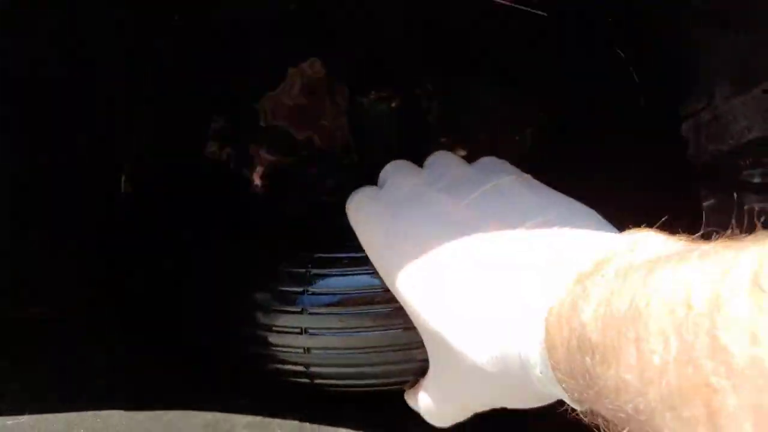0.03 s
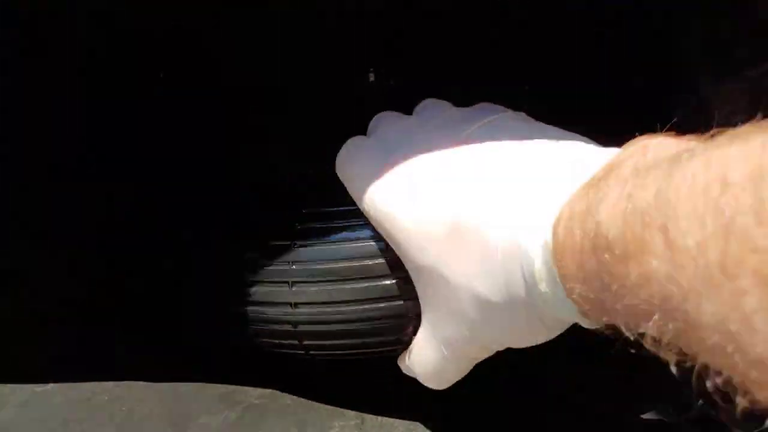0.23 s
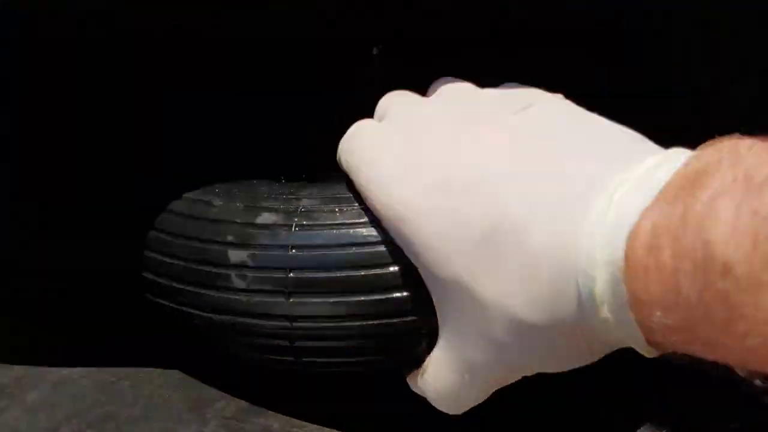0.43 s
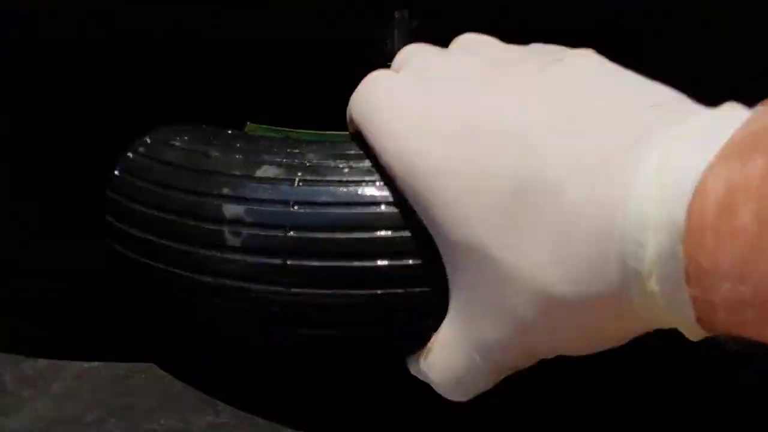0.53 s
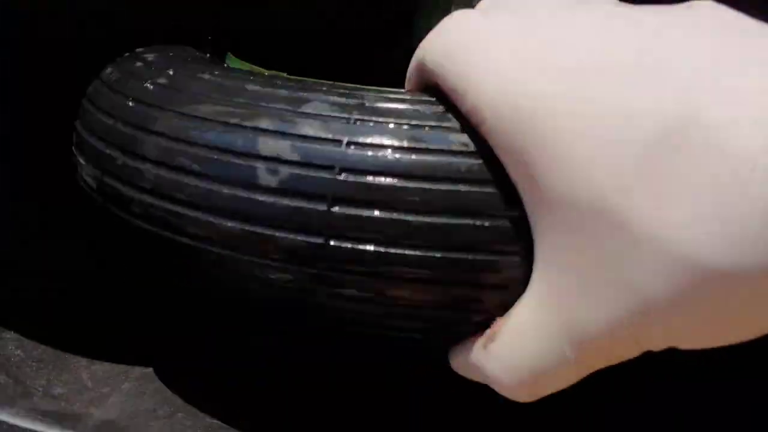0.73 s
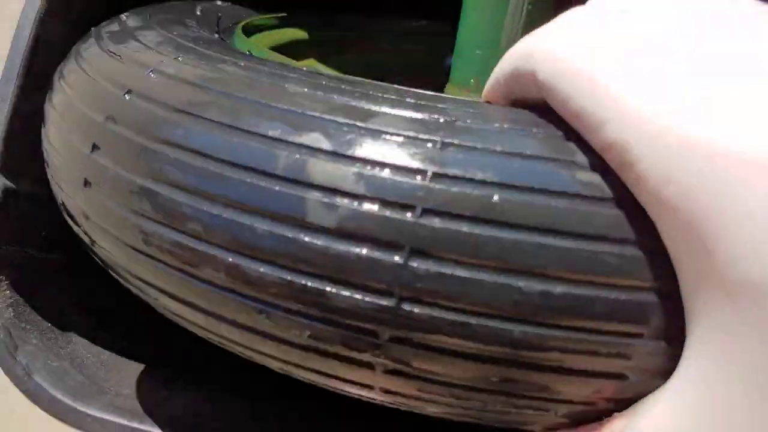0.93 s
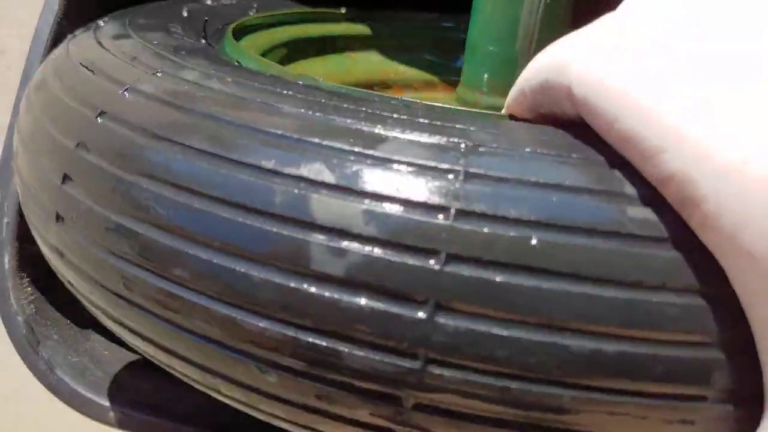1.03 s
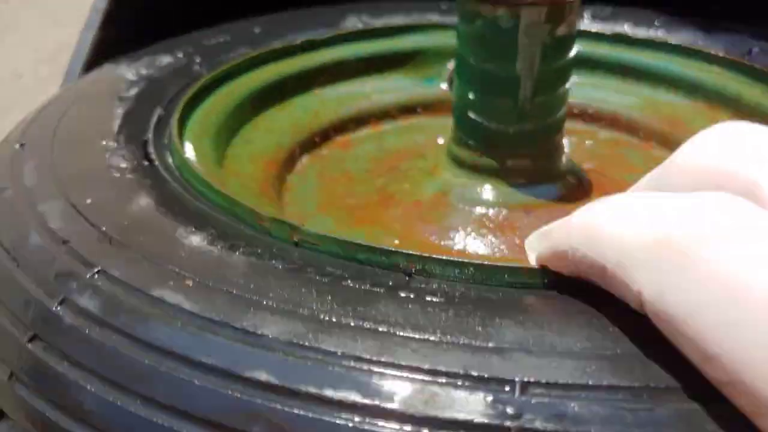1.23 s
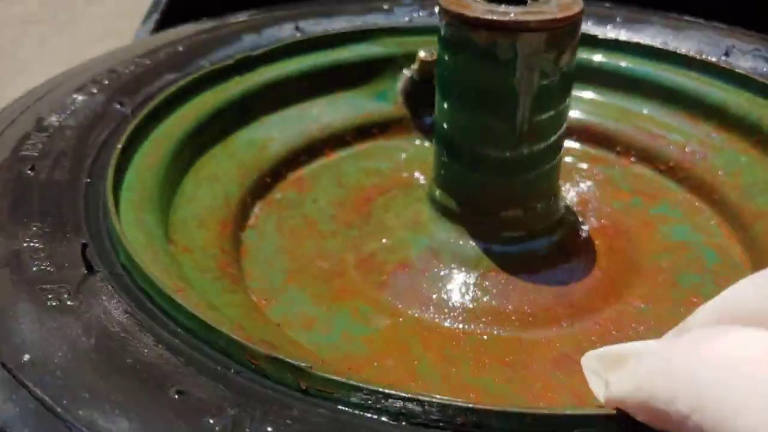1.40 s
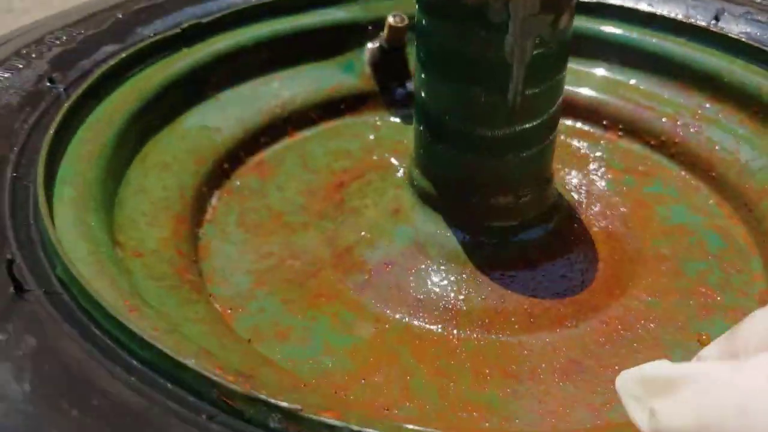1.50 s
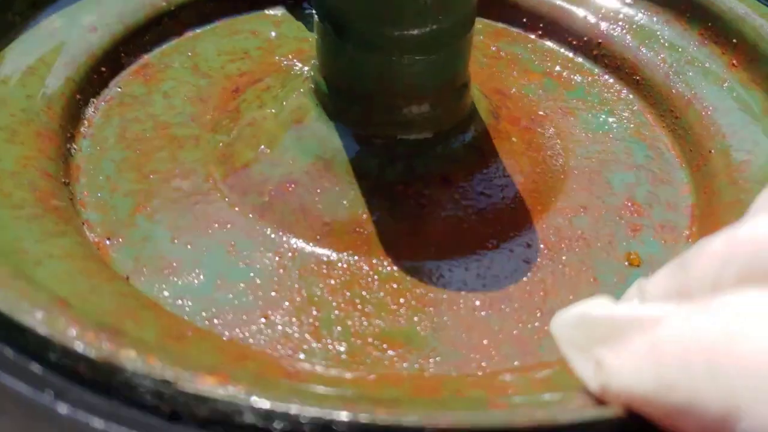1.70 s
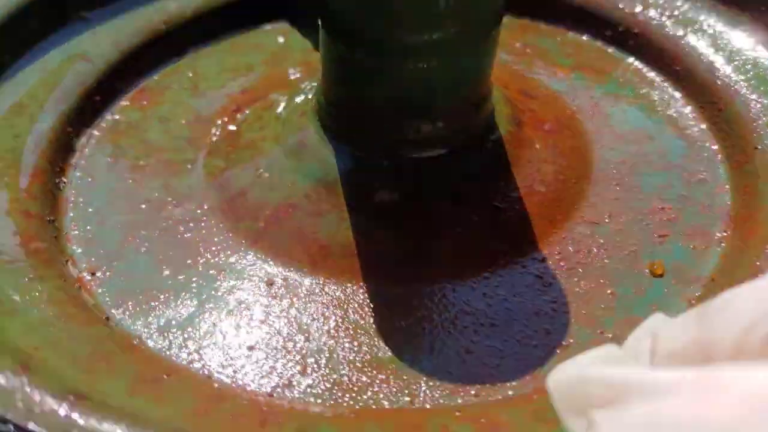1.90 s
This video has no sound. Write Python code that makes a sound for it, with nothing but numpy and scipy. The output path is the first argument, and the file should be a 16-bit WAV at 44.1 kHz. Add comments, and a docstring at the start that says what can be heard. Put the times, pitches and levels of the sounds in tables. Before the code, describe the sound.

Close, outdoor splashing: water swells and gurgles hollowly as a wheel comes out of a tub and sheds a short stream. Light plinking drips follow, ending with tiny bubbly squeaks over a faint hiss.

```python
"""Outdoors, at a plastic tub of water, a small wheel with a rubber tyre is lifted out by a gloved hand.
Water sheets off the tread, gulps and splashes as the tyre breaks free, then thins to drips.
Trapped bubbles ring as damped oscillators, drop impacts give broadband ticks, and the tub adds
air resonances and wall echoes. The water film on the wheel crackles and, at the end, chirps.
A faint hiss, a low rumble and the hum of a far machine lie underneath."""
import sys
import numpy as np
from scipy import signal
from scipy.fft import rfft, irfft
from scipy.io import wavfile
from scipy.ndimage import uniform_filter1d

SR = 44100
rng = np.random.default_rng(int(sys.argv[2]) if len(sys.argv) > 2 else 0)


def put_to_file(sound):
    """Save the sound as 16-bit audio at rate SR, in the file named by the first command-line argument."""
    columns = np.atleast_2d(sound).T  # one column per channel
    safe = np.clip(columns, -1, 1)
    whole_steps = np.round(safe * 32767)
    wavfile.write(sys.argv[1], SR, whole_steps.astype(np.int16))


N = 85995
T = np.arange(N) / SR


def from_db(db):
    """The decibel scale: 20 dB is a factor of ten in amplitude."""
    return 10 ** (np.asarray(db) / 20)


def unit_power(x):
    """RMS normalisation: the mean square becomes one."""
    return x / np.sqrt(np.mean(x ** 2) + 1e-20)


def level(rows):
    """Amplitude envelope interpolated through rows of t/s, level/dB."""
    return from_db(np.interp(T, *np.transpose(rows)))


def gain_at(colour, hz):
    """Spectral envelope: rows of f/Hz, level/dB, interpolated in log frequency."""
    f, db = np.transpose(colour)
    return from_db(np.interp(np.log(hz + 1), np.log(f), db))


def pan(db):
    """Interaural level difference: left over right by db, at constant power."""
    return unit_power(from_db(np.array([[db], [-db]]) / 2))


def place(sound, pan_db, max_lag_s=.00012):
    """Interaural time and level difference: the far side hears it later and softer."""
    lag = max_lag_s * SR * np.tanh(pan_db / 6)
    right = np.roll(sound, int(np.rint(lag))) * (np.arange(len(sound)) >= lag)
    return pan(pan_db) * np.array([sound, right])


def tint(x, colour):
    """Linear filtering: the spectrum is multiplied by a colour; unit power."""
    hz = np.arange(N + 1) * SR / (2 * N)
    return unit_power(irfft(rfft(x, 2 * N) * gain_at(colour, hz))[..., :N])


def noise(colour, correlation):
    """Partial coherence: mid and side noise set the left-right correlation; unit power."""
    mid, side = rng.standard_normal((2, N))
    return tint(np.sqrt(1 + correlation) * mid + np.sqrt(1 - correlation) * side * [[1], [-1]], colour)


def jitter(samples):
    """A moving average low-passes white noise into a random wobble; unit power."""
    return unit_power(uniform_filter1d(rng.standard_normal(N), size=samples))


def add(out, start_s, sound):
    """Superposition: a sound joins the mix at its onset."""
    i = int(np.clip(start_s * SR, 0, N - 1))
    out[:, i:i + sound.shape[-1]] += sound[..., :N - i]


def bursts(rows, attack_s=.00076):
    """Impulsive excitation: envelopes that rise at once and decay exponentially."""
    return sum(np.clip((T - s) / attack_s, 0, 1) * from_db(db - 60 * np.abs(T - s) / t60)
               for s, db, t60 in rows)


def droplets(colour, per_s, spread_db):
    """Shot noise: independent ticks of uneven size; unit power."""
    sizes = from_db(spread_db * np.minimum(rng.exponential(1, N), 3))
    arrivals = rng.random(N) < per_s / SR
    return tint(arrivals * sizes * rng.normal(.63, 1, (2, N)), colour)


def bubble(hz, t60, rise_oct_per_s, wobble=0, attack_s=.0012, max_rise_oct=.65):
    """Minnaert resonance: a damped sine whose pitch climbs as the bubble nears the surface."""
    t = T[:int(max(t60, .002) * SR)]
    pitch = np.minimum(hz * 2 ** np.minimum(rise_oct_per_s * t, max_rise_oct), SR / 2)
    if np.ndim(wobble):
        pitch = pitch * (1 + wobble[:len(t)])
    envelope = from_db(-60 * t / t60) * (1 - np.exp(-t / attack_s))
    return envelope * np.sin(2 * np.pi * np.cumsum(pitch) / SR)


def swarm(colour, low_hz, high_hz, cycles, size_db, rise_oct_per_s, width_db, count):
    """Incoherent sum of bubbles of random time, pitch, size and place, levelled to near unit power."""
    out = np.zeros((2, N))
    for when, pitch, size, life, climb, side, lag in rng.random((count, 7)):
        hz = low_hz * (high_hz / low_hz) ** pitch
        gain = gain_at(colour, hz) * hz * from_db(size_db * size ** 2)
        ring = bubble(hz, cycles * (.5 + life) / hz, rise_oct_per_s * climb)
        delay = int(lag * 24)  # left leads or trails right by up to 12 samples
        pair = np.array([np.pad(ring, (delay, 24 - delay)), np.pad(ring, (12, 12))])
        add(out, when * N / SR, gain * pan(width_db * (2 * side - 1)) * pair)
    power = uniform_filter1d(np.mean(out ** 2, axis=0), size=3000)
    return out / np.sqrt(np.abs(power) + .017 * power.mean())


def background():
    """Continuous spectra of rumble and hiss under the line spectrum of a far machine."""
    # spectra of the rumble, the hiss and the hum: f/Hz, level/dB
    rumble_colour = [(22, -20), (40, 3.5), (58, 6.5), (75, 7), (115, 12), (150, -2), (200, -3.5),
                     (290, -7.5), (600, -54)]
    hiss_colour = [(300, -6.5), (700, 0), (1500, -5.5), (3000, -1), (4500, 4.5), (5500, 5.5), (6400, -8),
                   (9000, -9.5), (11300, -14.5), (12400, -46)]
    hum_lines = [(59, -47), (119, -46), (1760, -61)]
    # slow swell of the hiss: t/s, level/dB
    hiss_swell = [(0, -48), (.9, -40.5), (1.4, -40), (1.95, -37.5)]
    hum = sum(from_db(db) * np.sqrt(2) * np.sin(2 * np.pi * (hz * T + rng.random()))
              for hz, db in hum_lines)
    rumble = from_db(-40.5) * noise(rumble_colour, .58)
    hiss = level(hiss_swell) * noise(hiss_colour, .067)
    return pan(-2.2) * (rumble + hum) + pan(2.7) * hiss


def glove():
    """Friction: the rubber glove creaks in faint noise bursts as it grips the tread."""
    # creaks: t/s, level/dB, T60/s
    creaks = [(.112, -54, 0.017), (.128, -48, .015), (.177, -53, 0.018), (.193, -51, .015),
              (.205, -40, 0.017)]
    # their spectrum: f/Hz, level/dB
    colour = [(2500, -14), (5000, -6), (9000, 0), (12000, 0), (13500, -30)]
    return bursts(creaks) * noise(colour, .6)


def film():
    """Small cavities resonate high: tiny bubbles burst and crackle as the wheel drains."""
    # envelope of the crackle: t/s, level/dB
    envelope = [(0, -60), (.45, -65), (.55, -64), (.6, -41.5), (.95, -47), (1.19, -45), (1.27, -52),
                (1.58, -48), (1.7, -46), (1.75, -42.5), (1.82, -41), (1.87, -47), (1.95, -47)]
    # its spectrum: f/Hz, level/dB
    colour = [(2500, -16), (3800, -10), (5200, -1.5), (6600, -0.5), (8200, 1.5), (10000, -3), (11300, -36),
              (12600, -42)]
    pops = swarm(colour, 3000, 11000, cycles=40, size_db=13, rise_oct_per_s=25, width_db=12, count=1000)
    ticks = droplets(colour, per_s=430, spread_db=3)
    return level(envelope) * pan(1) * (from_db(-2) * pops + from_db(-4.5) * ticks)


def chirps(rise_oct_per_s=8.5, roughness=.03):
    """Frequency modulation: air in the water film squeaks in short, rough, rising glides."""
    # tiny bubbles on the wet wheel: t/s, f/Hz, peak level/dB, duration/s, left-right/dB
    squeaks = [(1.732, 7930, -25.5, 0.0062, -0.5), (1.751, 8000, -30, 0.0091, 0.5),
               (1.756, 5700, -40, .009, 0), (1.78, 3745, -22.5, 0.013, -5.5),
               (1.785, 4270, -24, 0.0062, 4.5), (1.796, 3680, -25, 0.004, 2),
               (1.797, 6100, -29.5, 0.007, 26), (1.818, 4200, -28, 0.013, 9), (1.826, 4830, -27, 0.017, 21),
               (1.837, 5570, -30, 0.022, 28), (1.86, 4350, -21.5, 0.0056, 19),
               (1.877, 4990, -29.5, 0.015, 39), (1.923, 3930, -27, .011, 25),
               (1.931, 7530, -28, 0.021, -3.5), (1.941, 3150, -28, .012, 4)]
    out = np.zeros((2, N))
    for s, hz, db, duration, pan_db in squeaks:
        t = T[:int(duration * SR)]
        pitch = hz * 2 ** (rise_oct_per_s * t) * (1 + roughness * jitter(24)[:len(t)])
        envelope = from_db(db) * np.sin(np.pi * t / t[-1])
        add(out, s, place(envelope * np.sin(2 * np.pi * np.cumsum(pitch) / SR), pan_db))
    return out


def tub_echoes(x, t60=.12, low_cut_hz=450):
    """Repeated reflection between the tub walls forms comb filters; long waves diffract past."""
    # round trips between the walls, a left row and a right row: t/ms
    round_trips = [(3.3, 5.3, 7.1, 9.7, 11.9, 14.3, 17.3, 21.1),
                   (3.9, 5.8, 7.9, 10.3, 12.8, 15.7, 18.9, 22.7)]
    high_pass = signal.butter(4, low_cut_hz, "high", fs=SR, output="sos")
    spectrum = rfft(signal.sosfilt(high_pass, x.mean(axis=0)), 2 * N)
    sample_phase = -2j * np.pi * np.arange(N + 1) / (2 * N)
    out = []
    for trips in round_trips:
        walls = 0
        for k, ms in enumerate(trips):
            loop = from_db(-60 * ms / 1000 / t60) * np.exp(sample_phase * int(ms * SR / 1000))
            walls += (-1) ** k * np.sqrt(ms) * loop / (1 + (-1) ** (k // 2) * loop)
        out.append(irfft(spectrum * walls / np.sqrt(np.mean(np.abs(walls) ** 2)))[:N])
    return pan(3.2) * np.array(out)


def tub_air(x):
    """Forced resonance: the normal modes of the air above the water ring hollow."""
    # air modes of the tub: f/Hz, bandwidth/Hz, gain/dB
    modes = [(444.5, 6, -6.5), (554, 8.3, -3.5), (622, 13.7, 3), (803, 22, -12), (1037, 13, -1.5),
             (1106, 32, -3), (1630, 100, -8.5), (2840, 60, -2.5), (3530, 37, -14)]
    return sum(from_db(db) * signal.lfilter(*signal.iirpeak(hz, hz / width, fs=SR), x)
               for hz, width, db in modes)


def tub_boom():
    """The tub's lowest air resonance, heard as narrow-band noise near 200 Hz."""
    # envelope of the boom: t/s, level/dB
    envelope = [(0, -67), (.17, -79), (.21, -35), (.3, -41.5), (.42, -47.5), (.53, -40.5), (.66, -38.5),
                (.75, -34.5), (.83, -32), (.89, -38.5), (1.0, -33.5), (1.15, -42), (1.24, -58), (1.38, -45),
                (1.5, -65), (1.82, -59), (1.9, -40.5), (1.95, -57)]
    # resonance curve: f/Hz, level/dB
    colour = [(130, -12), (175, -10), (200, 4.5), (240, -3), (290, -11), (420, -46.5)]
    return level(envelope) * noise(colour, .97)


def churn():
    """Large cavities resonate low: the tyre and the run-off stir up gurgling bubbles."""
    # envelope of the churning: t/s, relative level/dB
    envelope = [(0, -102), (.17, -52), (.215, -40.5), (.33, -37), (.53, -40), (.6, -43), (.68, -34),
                (.75, -24.5), (.83, -34.5), (.875, -39.5), (1.03, -38), (1.08, -45), (1.115, -36.5),
                (1.2, -49), (1.45, -57.5), (1.64, -47.5), (1.72, -62), (1.95, -76)]
    # its spectrum: f/Hz, level/dB
    colour = [(200, -9), (300, -10), (450, -13.5), (600, -3.5), (800, -6), (1100, -4.5), (1600, -2),
              (2500, -46)]
    gurgle = swarm(colour, 292, 1860, cycles=19.2, size_db=0, rise_oct_per_s=6.4,
                   width_db=11.5, count=1000)
    wash = noise(colour, .97)
    return level(envelope) * pan(-2.5) * (from_db(2) * gurgle + from_db(-3.5) * wash)


def spray(break_free_s=.654, break_time_s=.04):
    """Sheet break-up: a smooth wash turns to small bubbles and ticks as the tyre leaves the water."""
    # envelope of the spray falling into the tub: t/s, relative level/dB
    envelope = [(0, -52.5), (.17, -55.5), (.22, -43.5), (.33, -37), (.46, -33), (.56, -30.5), (.578, -54),
                (.6, -33.5), (.65, -34.5), (.71, -25.5), (.76, -25.5), (.79, -22), (.84, -23), (.872, -35),
                (.92, -37.5), (.94, -31.5), (.97, -32.5), (1.04, -30), (1.085, -31), (1.115, -28),
                (1.16, -36.5), (1.24, -46), (1.32, -47), (1.45, -51.5), (1.63, -68), (1.7, -82),
                (1.95, -58)]
    # its spectrum: f/Hz, level/dB
    colour = [(700, -10), (1500, -3.5), (2100, 2.5), (3000, 3), (4000, 3), (5200, -0.5), (6300, -13),
              (8200, -11.5), (11600, -19.5), (12600, -42), (15500, -57)]
    fizz = swarm(colour, 1172, 10990, cycles=54, size_db=2.5, rise_oct_per_s=9.3, width_db=3, count=2200)
    ticks = droplets(colour, per_s=1800, spread_db=4)
    grains = from_db(-.5) * fizz + from_db(-3.5) * ticks
    # while the sheet holds, 70 % of the grains' power goes into the wash
    sheet = .7 * (1 - np.tanh((T - break_free_s) / break_time_s)) / 2
    wash = np.sqrt(from_db(-1) ** 2 + sheet * np.mean(grains ** 2)) * noise(colour, .094)
    return level(envelope) * pan(1.5) * (np.sqrt(1 - sheet) * grains + wash)


def drips(roughness=.031):
    """Air entrainment: gulps and drips trap single bubbles, each ringing at its own frequency."""
    # bubbles: t/s, f/Hz, level/dB, T60/s, glide/(octave/s), left-right/dB
    bubbles = [ (.581, 1017, -27.5, .04, 6, -4), (.626, 834, -13, 0.053, 1.5, -6),
               (.640, 352.6, -18.5, 0.11, 1, 0.5), (0.662, 2935, -9.5, 0.031, 7.5, 7.5),
               (0.673, 3130, -21, .02, -5, 4), (.690, 610, -12.5, 0.073, 10.5, -2.5),
               (.704, 3480, -7.5, 0.031, -6, 4), (0.709, 4700, -7.5, 0.02, 4, 21),
               (0.729, 5370, -4, 0.012, -4, 20), (0.731, 4530, -9, 0.019, -2, 12),
               (.736, 2810, -9, 0.033, -1, 1), (.739, 692, -16, 0.17, 32, -2),
               (0.747, 479, -7, 0.048, -1, -3), (0.757, 1082, -18.5, .1, -1.5, 2),
               (.764, 612.6, -16.5, 0.18, -4, -11), (0.776, 1697, -18, 0.055, -2, -1),
               (0.786, 3690, -6.5, .02, 20, 15), (0.788, 4660, -6, 0.017, 12, 15),
               (.797, 3480, -13, 0.023, 16, -1), (.815, 3760, -2.5, 0.014, 19, 19),
               (0.819, 4640, -8.5, 0.032, -5, 21), (0.837, 3130, -13, 0.026, 0, 14),
               (.851, 610, -18, 0.043, 5, -5), (.906, 2330, -20, 0.028, 5, 3),
               (.937, 4950, -10.5, 0.017, 24, 21), (.964, 560, -24, 0.075, -1, -1),
               (0.988, 2580, -15, .025, 6, -1), (.989, 3410, -9.5, 0.035, 10, 19),
               (.996, 5700, -15, 0.017, 9, 23), (1.033, 2100, -17, 0.024, 3, -2),
               (1.039, 4630, -9, 0.026, 0, 18), (1.067, 2620, -22, 0.039, 4, -1),
               (1.108, 595, -20.5, 0.064, -2, -2), (1.1262, 2940, -7.5, 0.026, 29, 1.5),
               (1.129, 3460, -9.5, 0.055, 2, 4), (1.182, 5630, -21, 0.024, 1, 17),
               (1.183, 3870, -19.5, 0.035, 1, 3.5), (1.224, 2305, -18.5, 0.023, 2, -5),
               (1.312, 2520, -21, 0.028, 17, -2.5), (1.339, 843, -25, 0.088, 4, -2),
               (1.364, 5380, -25, 0.077, 4.5, 17), (1.414, 2870, -26, 0.034, 10, 2),
               (1.422, 2320, -23.5, 0.023, -4, -8), (1.47, 2960, -23, 0.031, 24.5, 1.5),
               (1.484, 704, -30, .1, 4, -13), (1.486, 1575, -22.5, 0.022, 8, -3),
               (1.492, 2165, -27, 0.076, 5.5, 4.5), (1.517, 3500, -24.5, 0.036, 7, 2.5),
               (1.566, 2640, -25.5, 0.038, 0, -3), (1.577, 1730, -22, 0.019, -4, -5),
               (1.583, 529.4, -31, 0.26, 1, -3), (1.597, 1140, -34, 0.1, 15, -16),
               (1.608, 1444, -23, 0.083, 24, -3), (1.637, 690, -29.5, 0.12, 6.5, -4),
               (1.772, 885, -43, 0.26, -0.5, -1), (1.839, 1000, -32.5, .06, 23, -29),
               (1.918, 914, -35.5, 0.047, -2, -5)]
    out = np.zeros((2, N))
    for s, hz, db, t60, glide, pan_db in bubbles:
        ring = bubble(hz, t60, glide, wobble=roughness * jitter(60))
        add(out, s, place(from_db(db) * ring, pan_db))
    return out


def splashes():
    """Impact noise: heavy drops slap the surface and water spatters brightly on the tub wall."""
    # impacts on the surface and on the wall: t/s, level/dB, T60/s
    surface_hits = [(.626, -26, 0.094), (.691, -18.5, 0.079), (.780, -16.5, 0.096), (.933, -24, 0.088),
                    (.987, -18.5, 0.078), (1.036, -23, 0.054), (1.128, -21.5, 0.033), (1.182, -29, 0.11),
                    (1.224, -27.5, 0.023), (1.312, -28.5, 0.16), (1.411, -29, 0.035), (1.470, -39, 0.025),
                    (1.516, -33, 0.037), (1.562, -44, 0.11), (1.584, -26.5, 0.035), (1.635, -28.5, 0.042)]
    wall_hits = [(.663, -31, .02), (.705, -19, 0.023), (.713, -29, 0.27), (.783, -25, 0.11),
                 (.792, -29, 0.049), (.815, -23.5, 0.059), (.821, -25.5, .025), (1.038, -43, 0.051),
                 (1.127, -29, 0.018)]
    # their spectra: f/Hz, level/dB
    surface_colour = [(500, -23), (1200, -1), (2000, -1.5), (3300, -3.5), (5200, -1.5), (6500, -13),
                      (9000, -15), (11500, -18.5), (13000, -45)]
    wall_colour = [(3000, -1), (6500, -1), (9000, -3), (12000, -8), (15500, -16)]
    slaps = bursts(surface_hits) * droplets(surface_colour, per_s=6500, spread_db=-1)
    spatter = bursts(wall_hits) * pan(5.6) * droplets(wall_colour, per_s=4200, spread_db=1)
    return slaps + spatter


def scene():
    """Superposition of all sources; the flow drives the air modes, and water and chirps echo."""
    flow = spray() + churn()
    squeaks = chirps()
    water = from_db(-1) * (flow + tub_air(flow)) + drips() + splashes()
    echoes = tub_echoes(from_db(-6) * water + from_db(-8) * squeaks)
    return water + tub_boom() + squeaks + film() + echoes + background() + glove()


def record(dry, ceiling=.56, cutoff_hz=15800):
    """Soft saturation rounds the peaks; a steep low-pass limits the bandwidth."""
    rounded = dry / (1 + (dry / ceiling) ** 4) ** .25
    return signal.sosfilt(signal.ellip(10, .1, 80, cutoff_hz, fs=SR, output="sos"), rounded)


dry = scene()
out = record(dry)
put_to_file(out)
```